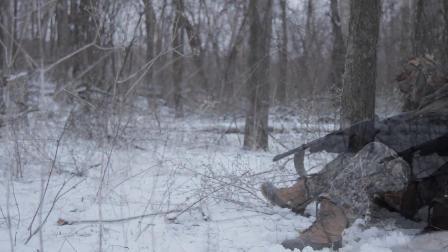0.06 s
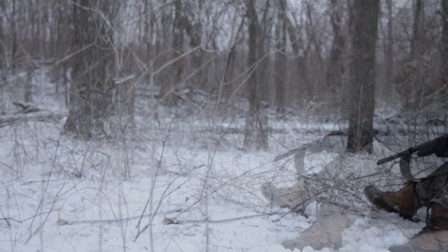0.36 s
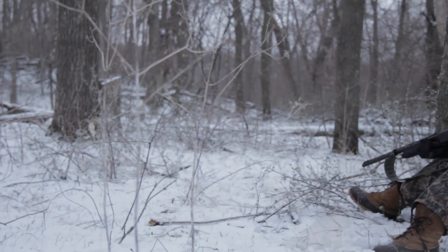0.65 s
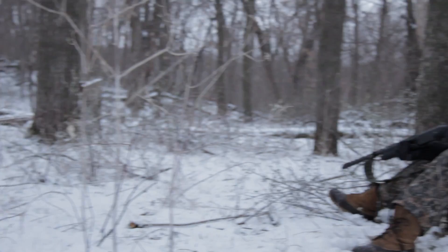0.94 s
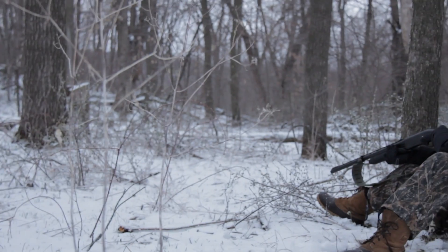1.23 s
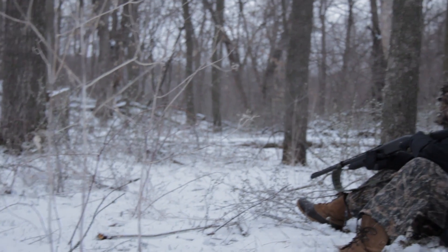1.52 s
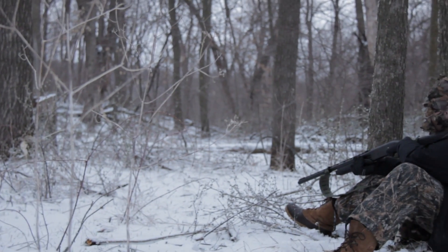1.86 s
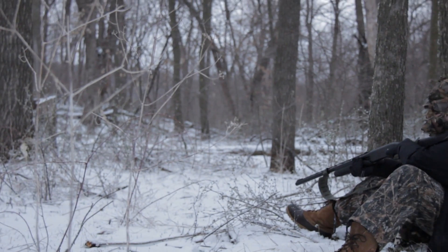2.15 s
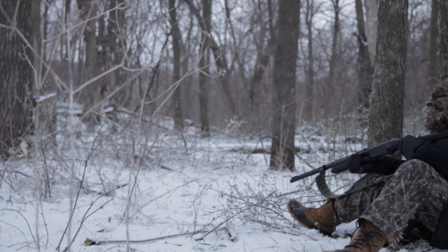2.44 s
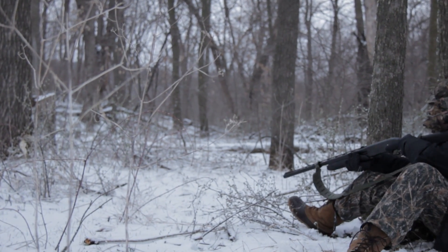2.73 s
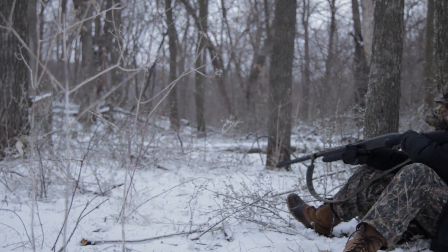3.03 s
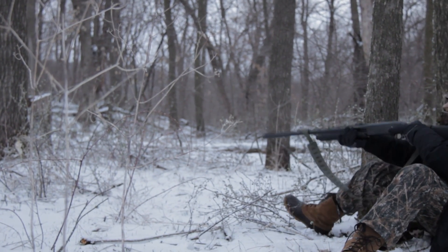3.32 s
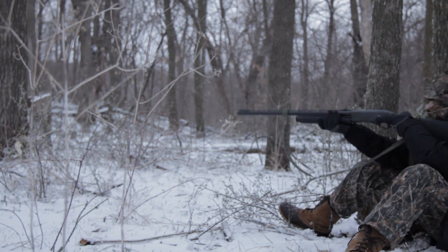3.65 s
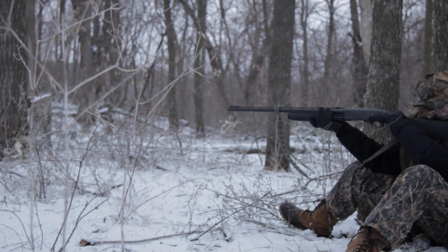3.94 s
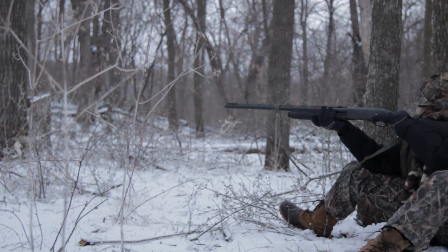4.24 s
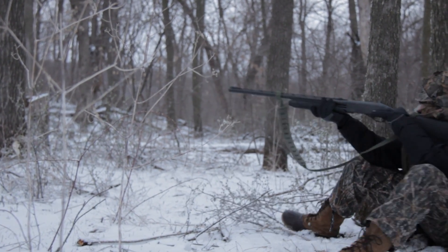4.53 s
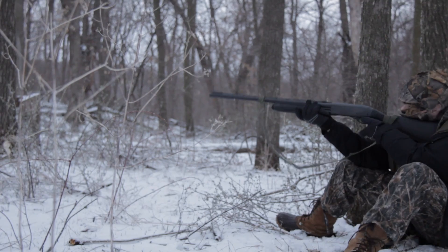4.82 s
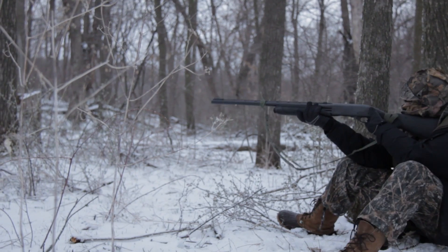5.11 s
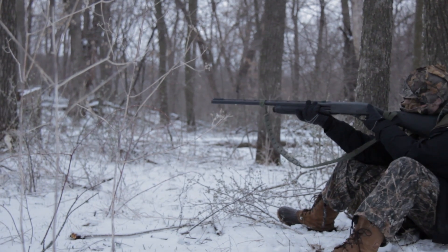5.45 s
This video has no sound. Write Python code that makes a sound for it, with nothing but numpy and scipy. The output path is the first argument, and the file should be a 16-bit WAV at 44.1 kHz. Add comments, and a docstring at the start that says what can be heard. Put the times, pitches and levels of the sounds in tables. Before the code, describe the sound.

A wild turkey calls nearby in quiet, snowy woods. Four evenly spaced, raspy yelps come first, then three quick, sharp clucks. After a pause, a longer run of clucks starts fast and slows down. The calls echo briefly off tree trunks over a low hush of air, with faint clothing rustles later on. Everything sits hard right, with only faint hiss on the left.

```python
"""A wild turkey calls in snowy woods: four raspy yelps, then a run of short, sharp notes.
Each note starts as a clean whistle and breaks into a rasp as a second membrane joins in.
A faint, yelp-pitched echo tail lingers at the start. Tree trunks throw the calls back over a low hush,
with one faint high chirp, perhaps a small distant bird, and later short rustles of clothing.
The scene sits hard right; the left channel carries only faint hiss."""
import sys
import numpy as np
from scipy import signal
from scipy.fft import rfft, irfft
from scipy.io import wavfile
from scipy.ndimage import uniform_filter1d

SR = 44100
rng = np.random.default_rng(int(sys.argv[2]) if len(sys.argv) > 2 else 0)


def log_audio(samples):
    """Write samples as a 16-bit WAV file to the path given in sys.argv[1]."""
    # one column per channel
    frames = np.atleast_2d(samples).T
    # limit to full scale, then quantise
    limited = np.clip(frames, -1, 1)
    pcm = np.round(limited * 32767).astype(np.int16)
    wavfile.write(sys.argv[1], SR, pcm)


N = 250484
BAND_LIMIT_HZ = 15720


def amp(db):
    """Decibels to gain."""
    return 10 ** (np.asarray(db) / 20)


def unit_rms(x):
    """Scales to rms 1."""
    return x / np.sqrt(np.mean(x ** 2) + 1e-20)


def curve(points, hz):
    """Joins (f/Hz, value) points by straight lines on a log-frequency axis."""
    f, value = np.transpose(points)
    return np.interp(np.log(hz + 1), np.log(f), value)


def add(mix, start_s, sound):
    """Mixes a sound in at its start time."""
    part = mix[max(round(start_s * SR), 0):][:len(sound)]
    part += sound[:len(part)]


def wander(size, rate_hz):
    """Smooth random modulation of rms about 1, rolling off above the given rate."""
    hz = np.fft.rfftfreq(SR, 1 / SR)
    spectrum = rfft(rng.standard_normal(SR)) / np.sqrt(1 + (hz / rate_hz) ** 4)
    return unit_rms(irfft(spectrum, SR))[:size]


def colour(x, points, bells=(), size=2048):
    """Causal EQ: a curve (f/Hz, gain/dB) plus bell boosts and cuts (f/Hz, width/Hz, gain/dB)."""
    f = abs(np.fft.fftfreq(size, 1 / SR))
    bells_db = sum(db * np.exp(-(2 * (f - hz) / width) ** 2) for hz, width, db in bells)
    log_gain = np.log(amp(curve(points, f) + bells_db))
    taps = np.fft.ifft(np.exp(np.conj(signal.hilbert(log_gain)))).real
    return signal.fftconvolve(x, taps[:size // 2])[:len(x)]


def hush():
    """Distant air stirs in the trees: a low, slowly swelling bed of noise."""
    spectrum = [(15, -66.5), (25, -27), (169, -4), (305, -6), (340, -4), (552, -9.5), (631, -10),
                (684, -11), (1140, -19), (1410, -17), (2060, -27), (3530, -32.5), (4260, -34),
                (15500, -40.5)]  # tone of the air: f/Hz, level/dB
    breeze = [(0, -2.5), (0.398, -5), (.8, 0), (2.6, -2), (3.199, -4.5), (4, 1.5), (5.68, -3)]  # its swells: t/s, level/dB
    swell_db = np.interp(np.arange(N) / SR, *np.transpose(breeze))
    return amp(-57 + swell_db) * unit_rms(colour(rng.standard_normal(N), spectrum, size=8192))


def chirp_and_rustles(relative_width=0.17, grain_db=3):
    """Grainy noise bursts: a faint high chirp, perhaps a small distant bird, then short rustles."""
    bursts = [(0.252, 0.065, -80, 3660), (2.528, 0.17, -59, 322), (3.136, 0.13, -76.5, 3590),
              (4.505, 0.3, -75.5, 7560), (4.872, 0.027, -51, 520), (5.019, 0.058, -49, 880),
              (5.403, .04, -76, 5560), (5.484, 0.097, -61.5, 407)]  # the chirp, then the rustles: t/s, length/s, level/dB, centre f/Hz
    out, hz = np.zeros(N), np.fft.rfftfreq(SR, 1 / SR)
    for start, length, db, centre in bursts:
        size = int(length * SR)
        spectrum = rfft(rng.standard_normal(SR)) / (1 + ((hz / centre - 1) / relative_width) ** 2)
        grainy = irfft(spectrum, SR)[:size] * amp(grain_db * wander(size, 90))
        add(out, start, amp(db) * unit_rms(grainy) * np.hanning(size))
    return out


def woods(x, early_db=9.5, early_s=0.052, spacing=20):
    """Many small echoes: a quick cluster from near trees, then a long tail that loses its treble."""
    decay_times = [(100, 2), (500, 0.68), (1000, 1.086), (1700, 1.15), (3000, 0.92), (6000, 0.65),
                   (14000, 0.24)]  # reverb of the wood: f/Hz, t60/s
    count = 3 * SR // (2 * spacing)
    taps = np.zeros(count * spacing)
    taps[np.arange(count) * spacing + rng.integers(0, spacing, count)] = rng.standard_normal(count)
    hz, t, spectra = signal.stft(taps, SR, nperseg=256)
    bloom = (1 + amp(early_db) * np.exp(-t / early_s)) * np.clip(t / 0.036, 0, 1)
    decay = amp(-60 * t / curve(decay_times, hz)[:, None])
    tail = signal.istft(spectra * bloom * decay, SR, nperseg=256)[1]
    return signal.fftconvolve(x, tail / np.linalg.norm(tail))[:N]


def trunks(x):
    """Single slaps back from the nearest trunks."""
    slaps = [(.012, -14), (0.024, -26), (.034, -24), (.047, -27), (0.072, -34)]  # one echo a trunk: delay/s, level/dB
    out = np.zeros(N)
    for delay, db in slaps:
        add(out, delay, amp(db) * x)
    return out


def gate_db(t, rise_s, release_s):
    """Attack and release of a note."""
    return 20 * np.log10(np.clip(np.minimum(t / rise_s, (t[-1] - t) / release_s), .01, 1))


def rasp_swell(t, peak_s, width_s, base, top):
    """Roughness swells to one peak, capped at 1, and clears again."""
    return np.clip(base + (top - base) * np.exp(-((t - peak_s) / width_s) ** 2), 0, 1)


def membrane(hz, harmonics=18):
    """One sharp pulse for each swing of a membrane."""
    phase = 2 * np.pi * np.cumsum(hz) / SR + rng.uniform(0, 2 * np.pi)
    return unit_rms(sum(np.cos(k * phase) * (k * hz < BAND_LIMIT_HZ) for k in range(1, harmonics + 1)))


def syrinx(hz, rough, throat, notch, squawk, second_ratio, jitter, waver, throb):
    """Two membranes beat and stumble as the note roughens; throat and beak colour them."""
    beak = [(5280, 830, 5.5), (6840, 200, 7), (7730, 1000, 3.5), (11100, 220, 7.5)]  # narrow upper resonances: f/Hz, width/Hz, boost/dB
    size = len(hz)
    # a quick, uneven throb: in each beat the pitch climbs, then slips back as the level dips
    beat = np.cumsum(76 * (1 + .35 * wander(size, 60))) / SR + rng.random()
    climb = throb * (beat % 1 - .5) / 4
    depth = throb * 0.9 * (1 - 0.25 * rough) * np.tanh(1 + wander(size, 46))
    tremolo = 1 - depth * np.cos(2 * np.pi * beat)
    first = membrane(hz * (1 + climb + waver * wander(size, 110) + jitter * rough * wander(size, 320)))
    second = membrane(hz * second_ratio * (1 + 0.0399 * wander(size, 250)))
    # in the rasp the pulses turn uneven, with turbulent air between them; the first membrane gives way
    flutter = 1 + .55 * rough * wander(size, 320)
    air = amp(-6) * (rough + 0.098) * rng.standard_normal(size)
    rasp = (amp(-3) * rough * second + air) * flutter
    whistle = first * flutter * amp(-3 * rough)
    # a side cavity cuts the notch; the rasp excites a broad squawk tuned to the note's mean pitch
    squawk_bell = (squawk["ratio"] * np.average(hz, weights=rough), squawk["width_hz"], squawk["db"])
    voice = colour(whistle, throat, beak + [notch]) + colour(rasp, throat, beak + [notch, squawk_bell])
    return voice, tremolo


def beak_opening(voice, level_db, treble_db, bite, open_s):
    """Upper overtones grow with effort and come in as the beak opens; the result is levelled."""
    t = np.arange(len(voice)) / SR
    dull = signal.sosfiltfilt(signal.butter(2, 2300, fs=SR, output="sos"), voice)
    brightness = amp(treble_db + bite * (level_db + 23.5)) * (1 - np.exp(-t / open_s))
    voice = dull + (voice - dull) * brightness
    power = uniform_filter1d(uniform_filter1d(voice ** 2, size=250), size=250)
    return voice / np.sqrt(abs(power) + 1e-12)


def breath_thump(level_db, rough, push_db, gust_db):
    """Air flows most freely in the clean whistle; only its changes are heard, as a soft thump."""
    flow = amp(push_db) * (1 - 0.61 * rough) + amp(gust_db) * wander(len(rough), 200)
    low_band = signal.butter(2, [27, 115], "bandpass", fs=SR, output="sos")
    return signal.sosfilt(low_band, np.pad(amp(level_db) * flow, (0, SR // 10)))


def yelps(notes, fade_db_per_s=140, drop_hz=140.2, drop_s=0.01302, sag_hz_per_s=329):
    """Each yelp swells from a soft whistle, holds and dies away; its pitch drops, then sags."""
    throat = [(350, -25.5), (520, -20.5), (730, -6), (930, -6), (1230, -19), (1540, 4), (1850, -9.5),
              (2450, -19), (3050, -14.5), (3500, -22.5), (4000, -22.5), (4600, -29), (5300, -32.5),
              (6250, -37), (12800, -57), (15500, -75)]  # throat colour in a yelp: f/Hz, gain/dB
    out = np.zeros(N)
    for start, length, db, swell_s, hold_s, mid_hz, rasp_s, roughness, treble_db in notes:
        t = np.arange(0, length, 1 / SR)
        shape_db = -16 * np.maximum(1 - t / swell_s, 0) - fade_db_per_s * np.maximum(t - hold_s, 0)
        level_db = db + gate_db(t, rise_s=0.0027, release_s=0.013) + shape_db
        hz = mid_hz + drop_hz * np.exp(-t / drop_s) - sag_hz_per_s * (t - length / 2)
        rough = rasp_swell(t, rasp_s, width_s=.029, base=.13, top=roughness)
        voice, tremolo = syrinx(hz, rough, throat, notch=(2720, 260, -30),
                                squawk=dict(ratio=2.97, width_hz=900, db=14),
                                second_ratio=1.19, jitter=0.049, waver=0.016, throb=0.5)
        voice = beak_opening(voice, level_db, treble_db, bite=0.9, open_s=0.024)
        add(out, start, amp(level_db) * voice * tremolo)
        add(out, start, breath_thump(level_db, rough, push_db=-33, gust_db=-22))
    return out


def sharp_notes(turn_s=0.0188, rasp_dip_db=-3.5):
    """Each note snaps on and bends once in pitch; the level dips while the rasp lasts."""
    # the run of notes: t/s, length/s, level/dB, ramp over the note/dB, start f/Hz, turn f/Hz, end f/Hz,
    # rasp peak after onset/s, rasp spread/s, roughness, treble/dB
    notes = [ (2.020, 0.054, -18, -18, 893, 963, 1230, 0.045, .015, 0.12, 0),
             (2.102, .091, -25.5, 5.5, 1207, 907.7, 983.4, .049, 0.019, 1.21, -2),
             (2.321, 0.073, -15, -13, 1078, 1007, 920, 0.038, 0.012, 0.78, -0.5),
             (3.316, 0.054, -19.5, -4.5, 968, 1015, 1014, 0.023, 0.016, 0.88, 1.5),
             (3.456, 0.07, -19.5, -4.5, 896.4, 880.4, 1083, 0.024, 0.023, 1.02, 2),
             (3.608, 0.076, -16, -6.5, 994.6, 1072, 979.4, 0.04, .013, 1.23, 0.5),
             (3.793, 0.074, -18.5, -6.5, 1018, 1072, 940, 0.037, 0.017, 1.18, 0),
             (4.035, 0.073, -19.5, -5.5, 1014, 981, 876, 0.038, 0.023, 1.2, 0),
             (4.354, 0.0601, -18.5, -5, 996.6, 1079, 945, 0.033, 0.012, 0.87, 0.5),
             (4.767, 0.054, -17.5, -7, 968, 978.2, 1022, .023, 0.014, 1.07, 0),
             (5.186, 0.052, -17.5, -5, 1014, 1091, 969, .020, 0.011, 0.25, 1),
             (5.612, 0.065, -20, -5.5, 1027, 1008, 1006, .030, 0.017, .9, -2)]
    throat = [(330, -28.5), (530, -13), (660, -16), (790, -3), (1060, 1.5), (1260, -6), (1600, -9),
              (2020, -23.5), (2400, -19), (2950, -16.5), (4200, -19), (5200, -33), (6200, -39), (8500, -53),
              (15000, -59.5)]  # throat colour in a sharp note: f/Hz, gain/dB
    out = np.zeros(N)
    for start, length, db, ramp_db, *pitches, rasp_s, spread_s, roughness, treble_db in notes:
        t = np.arange(0, length, 1 / SR)
        rough = rasp_swell(t, rasp_s, spread_s, base=.07, top=roughness)
        shape_db = ramp_db * t / length + rasp_dip_db * rough
        level_db = db + gate_db(t, rise_s=0.0055, release_s=0.012) + shape_db
        hz = np.interp(t, [0, turn_s, length], pitches)
        voice, tremolo = syrinx(hz, rough, throat, notch=(2410, 340, -20),
                                squawk=dict(ratio=1.84, width_hz=670, db=11),
                                second_ratio=0.89, jitter=0.052, waver=0.014, throb=0.14)
        voice = beak_opening(voice, level_db, treble_db, bite=0.087, open_s=0.011)
        add(out, start, amp(level_db) * voice * tremolo)
        add(out, start, breath_thump(level_db, rough, push_db=-15, gust_db=-26))
    return out


def scene():
    """The near bird, its echoes and the quiet wood, all on the right channel."""
    # the four yelps: t/s, length/s, level/dB, swell/s, fade start after onset/s, mid-note f/Hz,
    # rasp peak after onset/s, roughness, treble/dB
    yelp_notes = [ (.501, 0.13, -30, .006, 0.06, 744, 0.04, 0.82, 0.5),
                  (.838, 0.168, -23, .022, 0.069, 783.6, 0.05, 1.01, 2),
                  (1.186, 0.1386, -22.5, 0.021, 0.07, 779.4, 0.048, 0.84, 1),
                  (1.550, .133, -23.5, 0.0082, 0.094, 798.7, 0.058, 0.58, 0)]
    # reverb-only notes that leave a faint, yelp-pitched echo tail at the start: same columns
    tail_notes = [ (0, .1, -65, .01, 0.034, 755, .03, .3, 2), (.125, .09, -60, 0.012, .04, 734, .02, .2, 0)]
    yelping, sharp, tail_feed = yelps(yelp_notes), sharp_notes(), yelps(tail_notes)
    bird = yelping + sharp
    reverb_send = amp(-11.5) * yelping + amp(-12.5) * sharp + amp(-3) * tail_feed
    # snow and brush soak up parts of the echo, while the very top is lifted: f/Hz, gain/dB
    echo_eq = [(100, -4), (700, -1), (1050, -2), (3000, -2), (6000, -3.5), (14000, 10.5)]
    echoes = colour(trunks(bird) + woods(reverb_send), echo_eq)
    right = amp(6) * (bird + echoes + hush() + chirp_and_rustles())
    return np.array([np.zeros(N), right])


def record(dry):
    """Faint electronic hiss, louder on the idle left input, then the band limit."""
    hiss = amp([[-82], [-90]]) * rng.standard_normal((2, N))
    band_limit = signal.firwin(1023, BAND_LIMIT_HZ, window=("kaiser", 9), fs=SR)
    return signal.oaconvolve(dry + hiss, band_limit[None], "same")


dry = scene()
out = record(dry)
log_audio(out)
```